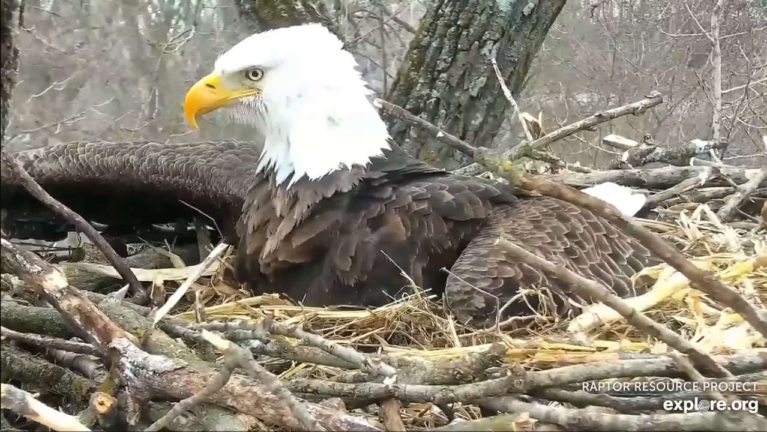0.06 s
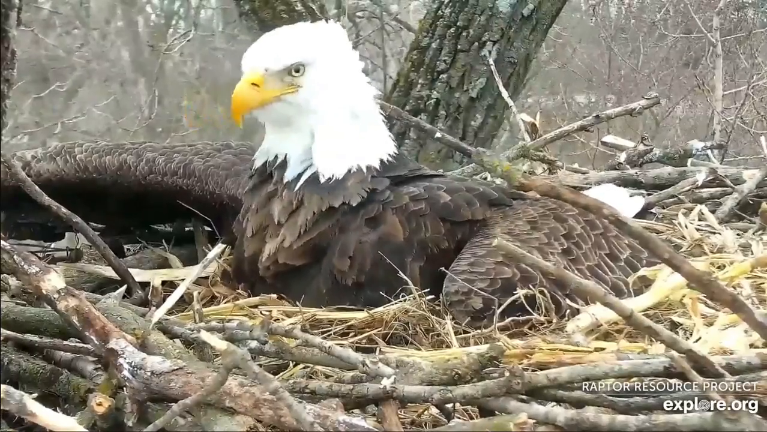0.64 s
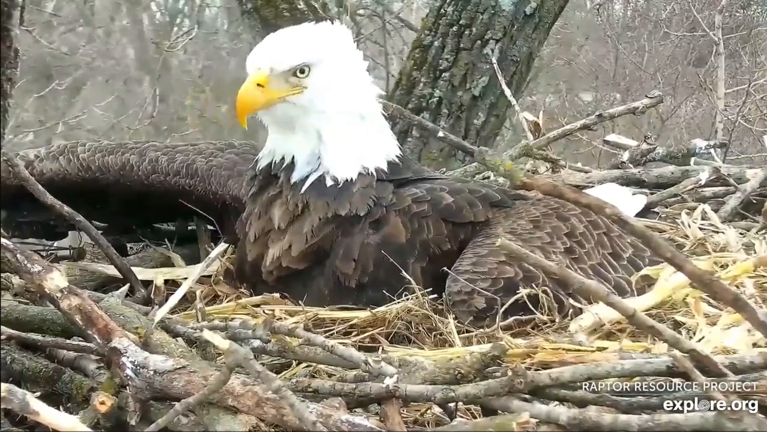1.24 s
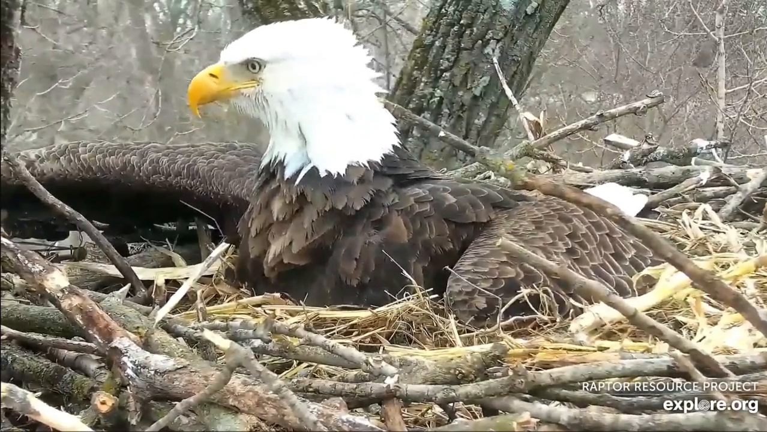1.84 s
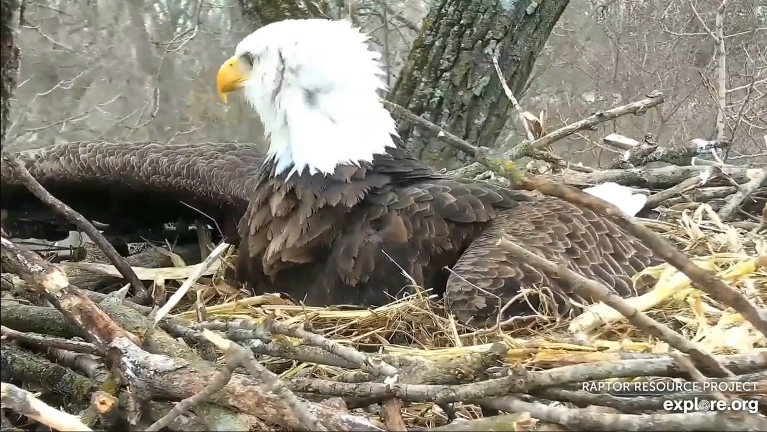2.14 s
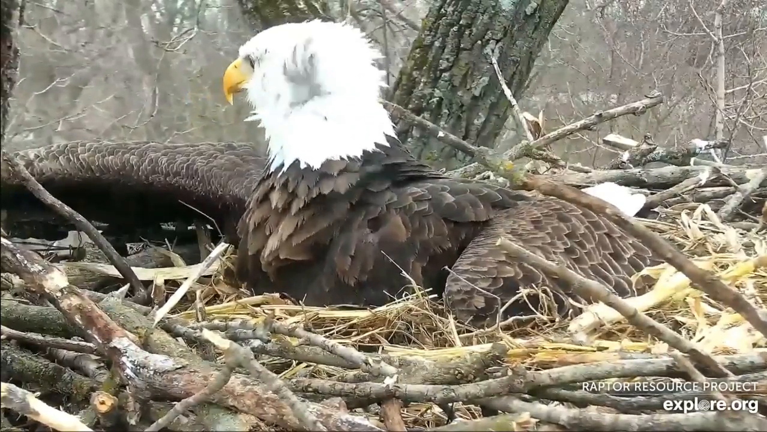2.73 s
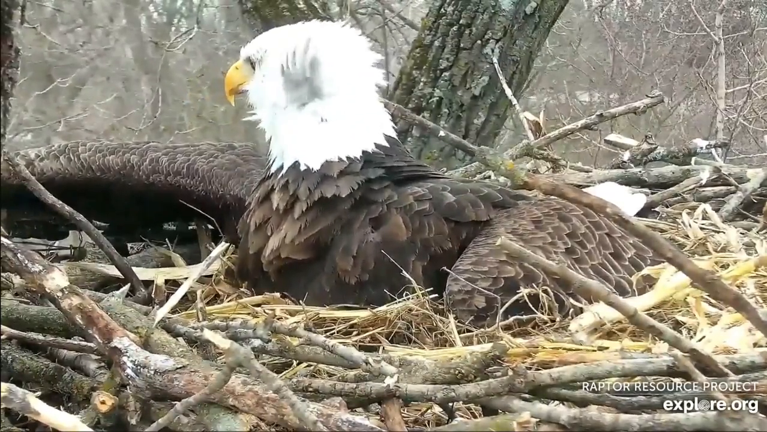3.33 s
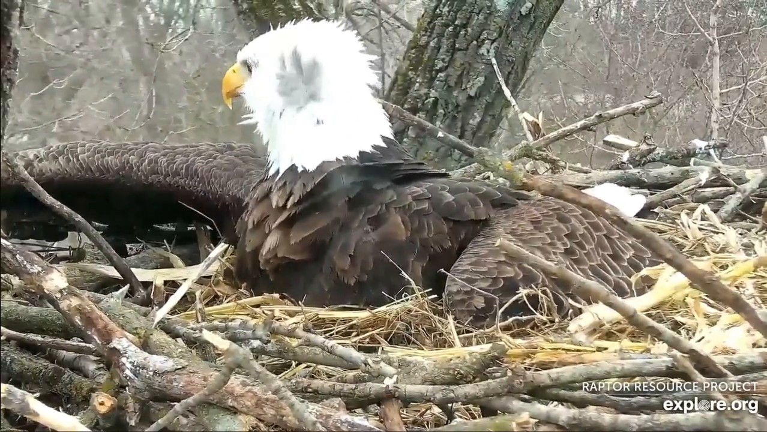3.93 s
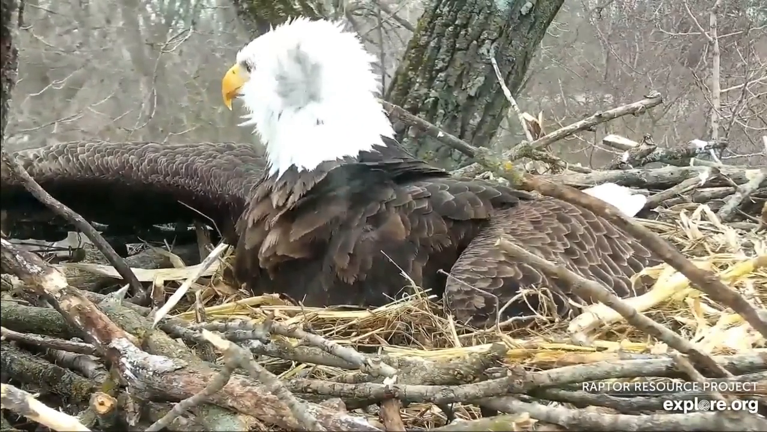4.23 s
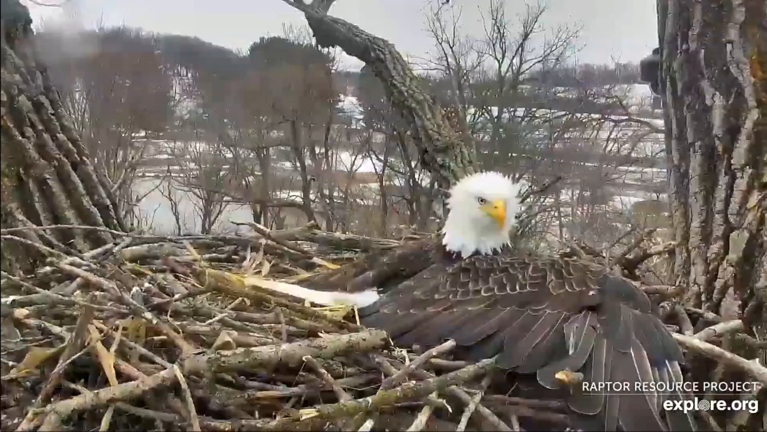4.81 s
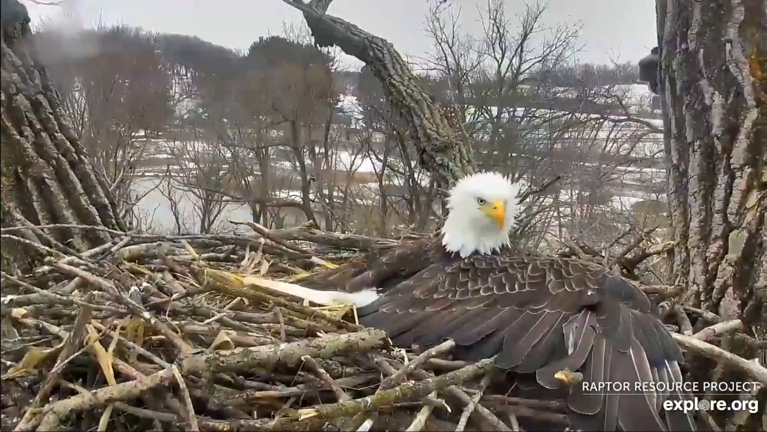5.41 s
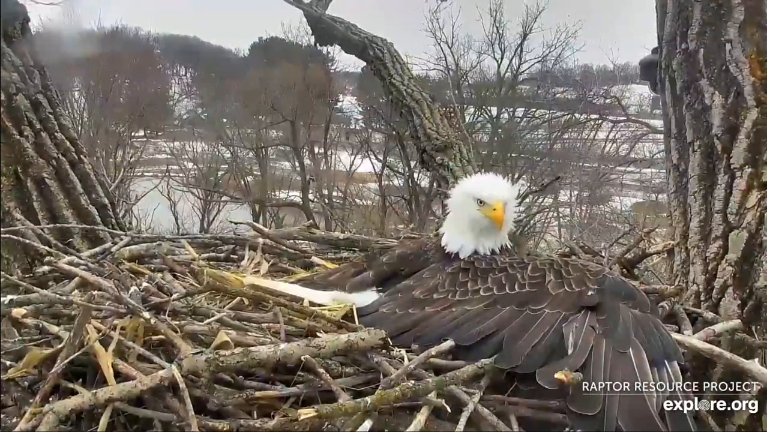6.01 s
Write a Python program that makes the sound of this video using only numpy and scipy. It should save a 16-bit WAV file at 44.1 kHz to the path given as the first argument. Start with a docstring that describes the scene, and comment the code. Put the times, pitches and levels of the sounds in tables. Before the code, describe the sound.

Wind rumbles heavily on the microphone while an eagle gives two runs of short, high chitters, with faint dry creaks nearby.

```python
"""From the start, wind buffets a microphone on a bald eagle's stick nest with a heavy rumble,
and soon something dry beside it creaks by stick-slip friction in short fizzy bursts.
At 2.3 s the eagle's syrinx gives a run of high chitters, each note a raspy catch and then a whistle;
trunks and branches return a faint echo. A second run follows from 4.7 to 5.3 s.
Gusts and creaks go on to the end over a faint hiss."""
import sys
import numpy as np
from scipy import signal
from scipy.fft import rfft, irfft
from scipy.io import wavfile
from scipy.ndimage import uniform_filter1d, minimum_filter1d

SR = 44100
rng = np.random.default_rng(int(sys.argv[2]) if len(sys.argv) > 2 else 0)


def generate_wav(signal):
    """Clip the signal to [-1, 1] and save it as 16-bit WAV at the path in sys.argv[1]."""
    frames = np.transpose(np.atleast_2d(signal))
    scaled = np.clip(frames, -1, 1) * 32767
    pcm = np.round(scaled).astype(np.int16)
    wavfile.write(sys.argv[1], SR, pcm)


N = 271656
TIME = np.arange(N) / SR
FREQ = np.maximum(np.fft.rfftfreq(N, 1 / SR), 1)


def syrinx(jitter=.055, shimmer=.98, waver=.014, flutter_hz=88, flutter=.32, bend=.0042,
           beat_hz=1080, beat=.61, rasp_db=-14, edge_s=.0087, sag=.45, flick=.03, closing_db=-11):
    """Flow-driven oscillation: the syrinx whistles; modulation by a second vibration adds sidebands."""
    # overtone filter of throat and open beak: (frequency [Hz], gain [dB])
    throat = [(6500, -21.5), (8800, -19.5), (10800, -21.5), (12300, -24), (13400, -40), (14500, -39),
              (16000, -49.5)]
    # spectrum of the breathy edge of the voice: (frequency [Hz], relative level [dB])
    rasp_colour = [(1500, -9.5), (2600, -5.5), (4000, 2.5), (6000, -6.5), (7800, -11.5), (10000, -8),
                   (13000, -19), (16000, -27.5)]
    out = np.zeros(N)
    shake, swell, quiver = wander(500), wander(400), wander(170)
    rasp = noise(colour(rasp_colour, FREQ))
    second_vibration = np.cos(2 * np.pi * np.cumsum(beat_hz * (1 + .08 * wander(92))) / SR)
    for start, length, mid_hz, arch, rise, db, rough, bright_db in syllables():
        span = slice(int(start * SR), int((start + length) * SR))
        t = TIME[span] - start
        along = t / length - .5
        ramp = np.minimum(t, length - t) / min(edge_s, length / 2)
        gate = np.sin(np.pi / 2 * np.clip(ramp, 0, 1))
        end_drop = flick * (1 - gate) * (along > 0)  # the pitch falls as the air stops
        hz = mid_hz * (1 + rise * along - arch * (2 * along) ** 2 - end_drop)
        throb = -np.cos(2 * np.pi * flutter_hz * t + .5 * quiver[span])
        detune = jitter * rough * shake[span] + waver * quiver[span] + bend * throb
        phase = 2 * np.pi * np.cumsum(hz * (1 + detune)) / SR
        # air pressure flutters and sags through the syllable; overtones need high pressure
        pressure = gate * (1 - sag * along) * (1 + flutter * throb)
        beak = undb(bright_db + closing_db * (t / length) ** 3)  # the closing beak dulls the end
        tone = np.sin(phase)
        for k in range(2, 5):
            overtone = (pressure * beak) ** (k / 2) * colour(throat, k * hz) * (k * hz < SR * .4)
            tone += overtone * np.sin(k * phase)
        unrest = rough * (shimmer * swell[span] + beat * second_vibration[span])
        voice = np.sqrt(2) * tone * (1 + unrest) / np.sqrt(1 + np.mean(unrest ** 2))
        breath = undb(rasp_db) * np.sqrt(rough) * rasp[span]
        out[span] += undb(db) * pressure * (voice + breath)
    return out


def syllables(overlap_s=.0054, catch_arch=.05, catch_rise=.09, whistle_arch=.003,
              squeak_arch=-.017, squeak_droop=.02, squeak_rough=.3, catch_bright_db=-2,
              squeak_bright_db=-3):
    """Frequency glides: a rising catch breaks into a whistle; in biphonation a squeak rides above."""
    # chitter notes: (whistle onset [s], length [s], pitch [Hz], droop [share of pitch], level [dB],
    # roughness [0-1], overtones [dB], catch lead [s], catch pitch [Hz], catch level [dB],
    # catch roughness [0-1])
    notes = [ (2.352, 0.033, 4360, -0.02, -21, 0.03, 0, 0.02, 4950, -40.5, 0.37),
             (2.483, 0.03, 5170, 0.018, -38.5, 0.07, 0, 0.019, 4790, -38, .5),
             (2.585, 0.042, 4133, -0.015, -28.5, .04, -1.5, 0.0064, 4900, -37.5, 0.44),
             (2.691, 0.03, 4090, -0.011, -31.5, .15, -7.5, 0.0033, 3460, -43, .5),
             (2.799, 0.024, 3900, 0.16, -48.5, .75, -7.5, 0.0056, 4800, -52, .6),
             (4.686, .010, 3600, .02, -47.5, 0.3, -8, 0.0015, 3620, -59, .5),
             (4.783, 0.032, 4540, 0.059, -32, 0.19, -2.5, .027, 4550, -41.5, 0.8),
             (4.907, 0.028, 4460, 0.068, -35, .1, -3, 0.039, 4470, -44.5, .95),
             (5, 0.026, 4500, .015, -27.5, 0.05, -4, .027, 3770, -38, .45),
             (5.091, 0.042, 3577, .03, -23.5, 0.03, 5, .010, 2620, -44.5, .5),
             (5.2, 0.033, 3534, 0.018, -23.5, 0.02, -3, .008, 2590, -40.5, .35),
             (5.295, 0.027, 3400, -0.0013, -28, .08, -8, 0.0039, 4410, -48.5, .2)]
    # a second, higher voice in strained notes: (time [s], length [s], pitch [Hz], level [dB])
    squeaks = [(2.459, 0.045, 6030, -45), (4.747, .013, 5300, -44.5), (4.866, 0.051, 5560, -38.5),
               (4.982, .022, 5600, -42)]
    for start, length, hz, droop, db, rough, bright_db, lead, catch_hz, catch_db, catch_rough in notes:
        yield (start - lead, lead + overlap_s, catch_hz, catch_arch, catch_rise,
               catch_db, catch_rough, catch_bright_db)
        yield start, length, hz, whistle_arch, -droop, db, rough, bright_db
    for start, length, hz, db in squeaks:
        yield start, length, hz, squeak_arch, -squeak_droop, db, squeak_rough, squeak_bright_db


def woods(calls, near_t60=.14, far_t60=1.1, far_db=-35):
    """Reverberation: nest and branches scatter the calls quickly; the trees add a faint tail."""
    # scatter from the nest in each run of calls: (time [s], level [dB])
    nest_echo = [(2.6, -15), (5.1, -21)]
    near_db = np.interp(TIME, *np.transpose(nest_echo))
    t = TIME[:SR]
    out = calls.copy()
    for t60, db in (near_t60, near_db), (far_t60, far_db):
        decay = undb(-60 * t / t60) * (t > .006)
        response = unit(rng.standard_normal(SR) * decay) / np.sqrt(SR)
        out += undb(db) * signal.fftconvolve(calls, response)[:N]
    return out


def wind(evenness=.7, rush_db=-26, rush_follows=.24, flicker_db=1.16, flicker_hz=45):
    """Turbulence: large, middling and small eddies press on the microphone, swelling with the gusts."""
    # strength of the wind: (time [s], buffeting level [dB], eddy level [dB])
    gusts = [(0, -21, -26), (.1, -17.5, -21), (.42, -18.5, -22.5), (.62, -13.5, -21), (1.35, -16, -24.5),
             (1.66, -16, -20), (1.9, -11, -18.5), (2.01, -15, -20.5), (2.11, -8.5, -19.5), (2.4, -13, -20),
             (2.85, -12, -19.5), (3.27, -21.5, -22), (3.42, -8.5, -18), (3.83, -15, -17), (4.03, -8, -18.5),
             (4.22, -17, -23), (4.35, -13.5, -17), (4.64, -8, -19), (4.79, -26, -21.5), (4.96, -8, -21),
             (5.05, -17, -22.5), (5.28, -18.5, -21.5), (5.43, -12, -18), (5.72, -21, -26),
             (5.8, -10.5, -21), (6.16, -8.5, -17.5)]
    # spectrum that shapes each band: (frequency [Hz], relative level [dB])
    wind_colour = [(15, -15), (25, -9.5), (36, -1.5), (54, 2.5), (80, -5), (120, -11.5), (195, -11),
                   (250, -19), (400, -26), (630, -36), (1000, -46.5), (1400, -56.5), (2000, -67),
                   (3000, -82)]
    times, *levels = np.transpose(gusts)
    buffet, eddies = (np.interp(TIME, times, db) for db in levels)
    rush = rush_db + rush_follows * eddies + flicker_db * wander(flicker_hz)
    outline = colour(wind_colour, FREQ)
    out = np.zeros(N)
    for low_hz, high_hz, db in (16, 115, buffet), (100, 275.5, eddies), (270, 2800, rush):
        band = noise(outline / np.sqrt((1 + (low_hz / FREQ) ** 12) * (1 + (FREQ / high_hz) ** 12)))
        # even out the noise, so that the slow swells belong to the gusts
        power = uniform_filter1d(band ** 2, SR // 12)
        out += undb(db) * unit(band / power ** (evenness / 2))
    return out


def slaps():
    """Pressure pulses: the hardest gusts thump the microphone and splutter into the middle range."""
    # hard gusts: (time [s], half length [s], thump level [dB], splutter level [dB])
    hard_gusts = [(0.582, 0.03, -15, -62), (1.894, 0.025, -7, -44.5), (2.235, 0.015, -10.5, -58),
                  (2.461, .014, -6.5, -41.5), (2.768, 0.015, -10.5, -52), (3.435, 0.036, -10, -59),
                  (3.735, 0.036, -11.5, -63), (4.612, 0.014, -13, -40.5), (4.873, 0.0091, -11, -38.5),
                  (6.029, 0.017, -12, -42.5)]
    # a soft swell of splutter: (time [s], half length [s], level [dB])
    swell = (2.52, 0.39, -50.5)
    # spectrum of the splutter: (frequency [Hz], relative level [dB])
    splutter_colour = [(300, -16), (700, 8), (1300, -2), (2200, -10), (4000, -22), (8000, -29),
                       (15000, -35.5)]
    # spectrum of the thump: (frequency [Hz], relative level [dB])
    thump_colour = [(15, -22.5), (45, 0.5), (90, -4.5), (180, -3), (280, -20), (700, -44), (2000, -90)]
    thump = sum(bump(at, half_s, db) for at, half_s, db, _ in hard_gusts)
    splutter = sum(bump(at, half_s, db) for at, half_s, _, db in hard_gusts) + bump(*swell)
    return splutter * noise(colour(splutter_colour, FREQ)) + thump * noise(colour(thump_colour, FREQ))


def creaks(scatter_db=2.5, unevenness=.2, grit_s=.0012, grit_share=.54, gain_db=-1, soft_hz=12600):
    """Stick-slip friction: slow slips tick, fast ones fizz; slips and their grit excite the same modes."""
    # bursts of slipping: (time [s], length [s], slip rate [1/s], relative level [dB])
    bursts = [ (.392, .036, 980, -58.5), (0.555, 0.054, 900, -56), (0.703, 0.041, 500, -52),
              (.819, 0.045, 350, -56), (1.496, 0.031, 170, -54.5), (1.649, 0.069, 120, -57),
              (1.828, .045, 600, -53.5), (1.885, .019, 800, -45), (1.903, .018, 640, -53),
              (1.94, 0.023, 1600, -56.5), (2.061, 0.022, 500, -52), (2.137, 0.013, 390, -53.5),
              (2.229, 0.036, 650, -53.5), (2.29, 0.038, 1100, -56), (2.439, 0.048, 400, -54),
              (2.535, 0.028, 1100, -55.5), (2.771, 0.017, 570, -54.5), (2.855, .039, 400, -57.5),
              (3.028, 0.046, 1040, -56), (3.296, .093, 330, -56), (3.501, .0065, 650, -57.5),
              (3.587, 0.058, 1500, -55), (3.716, 0.017, 230, -49.5), (3.776, 0.02, 230, -49.5),
              (3.979, 0.017, 370, -53), (4.015, .024, 820, -53), (4.28, 0.03, 1100, -54.5),
              (4.373, .014, 1200, -54), (4.407, 0.017, 500, -55), (4.481, 0.052, 670, -54.5),
              (4.623, 0.011, 930, -53), (4.851, 0.029, 400, -54), (5.126, .034, 700, -58),
              (5.356, 0.021, 600, -64.5), (5.52, .009, 500, -58.5), (5.997, 0.023, 300, -51.5)]
    # resonances of the creaking body: (frequency [Hz], bandwidth [Hz], relative level [dB])
    modes = [(2960, 330, -2.5), (3990, 710, -2.5), (5270, 220, -7), (6350, 230, 2.5), (6790, 470, 0),
             (9260, 670, 5), (10800, 500, -16), (11200, 650, -7.5), (14000, 400, -3)]
    slips = np.zeros(N)
    for start, length, rate, db in bursts:
        gap, size = rng.standard_normal((2, 160))
        times = np.cumsum(np.exp(unevenness * gap)) / rate
        times -= times[0]
        times = times[times < length]
        strength = unit(undb(scatter_db * size[:len(times)])) * np.sqrt(length * SR / len(times))
        slips[((start + times) * SR).astype(int)] += undb(db) * strength
    grit_envelope = signal.fftconvolve(slips, np.exp(-TIME[:SR // 100] / grit_s))[:N]
    grit = grit_envelope * rng.standard_normal(N) / np.sqrt(grit_s * SR / 2)
    force = np.sqrt(1 - grit_share) * slips + np.sqrt(grit_share) * grit
    body = sum(undb(db) / (1 + 1j * (FREQ / hz - hz / FREQ) * hz / width) for hz, width, db in modes)
    body /= np.sqrt(1 + (FREQ / soft_hz) ** 16)  # a slip takes a moment, which dulls the very top
    return undb(gain_db) * irfft(rfft(force) * unit(abs(body)), N)


def hiss(level_db=-65.5):
    """Stationary broadband noise: a faint, steady floor."""
    # spectrum of the hiss: (frequency [Hz], relative level [dB])
    hiss_colour = [(1200, -2.5), (2000, -5.5), (2800, -3.5), (4000, -7), (7000, -12.5), (11000, -14),
                   (15500, -9)]
    return undb(level_db) * noise(colour(hiss_colour, FREQ))


def undb(db):
    """Decibels to amplitude ratio."""
    return 10 ** (np.asarray(db) / 20)


def unit(x):
    """Normalisation to rms 1."""
    return x / np.sqrt(np.mean(x ** 2) + 1e-18)


def colour(points, hz):
    """Gain by interpolation of (frequency [Hz], level [dB]) points over log frequency."""
    at, db = np.transpose(points)
    return undb(np.interp(np.log(hz), np.log(at), db))


def noise(gain):
    """Spectral shaping: noise of rms 1 with the given gain per frequency."""
    return unit(irfft(rfft(rng.standard_normal(N)) * gain, N))


def wander(hz):
    """Low-pass noise: a random drift with its cutoff at hz."""
    return noise(1 / (1 + (FREQ / hz) ** 4))


def bump(at, half_length, db):
    """Gaussian envelope around one moment."""
    return undb(db) * np.exp(-((TIME - at) / half_length) ** 2)


def scene():
    """Superposition of hiss, the eagle with its echo, creaks and wind in one channel."""
    return (hiss() + woods(syrinx()) + creaks() + wind() + slaps())[None]


def record(dry, fade_s=.006, top_hz=15800):
    """Peak limiting: a smooth gain holds down the gusts; the ends fade and a low-pass cuts the top."""
    window = SR // 50
    needed_gain = 1 / np.maximum(abs(dry), 1)
    held_gain = minimum_filter1d(needed_gain, 2 * window)
    gain = uniform_filter1d(uniform_filter1d(held_gain, window), window)
    from_end_s = np.minimum(TIME, TIME[::-1])
    fade = np.sin(np.pi / 2 * np.minimum(from_end_s / fade_s, 1)) ** 2
    lowpass = signal.ellip(10, .1, 80, top_hz, fs=SR, output="sos")
    return signal.sosfilt(lowpass, dry * gain * fade)


dry = scene()
out = record(dry)
generate_wav(out)
```